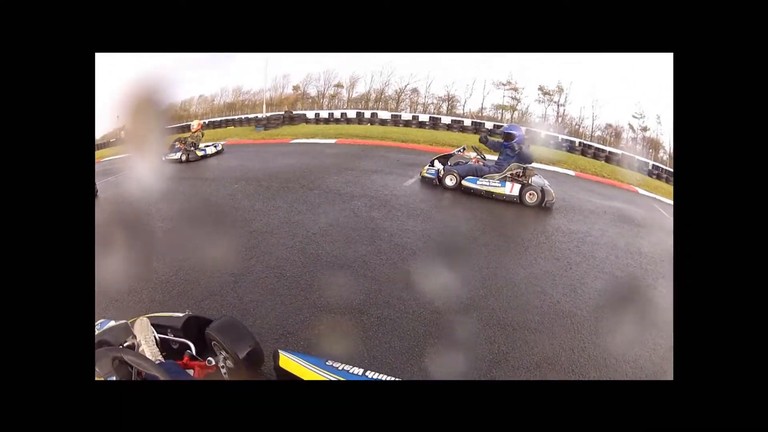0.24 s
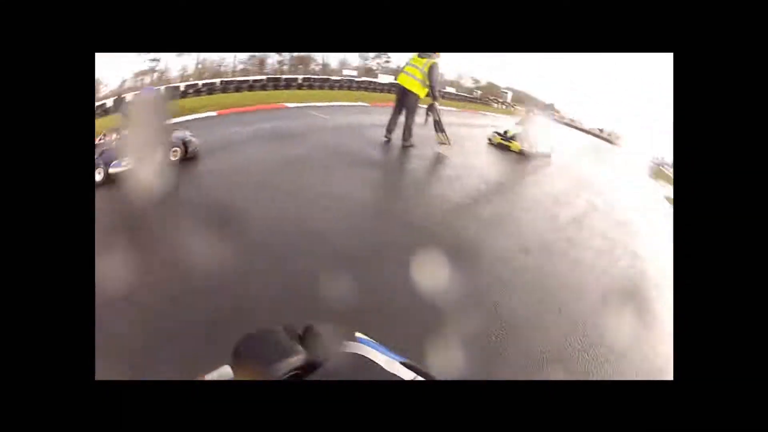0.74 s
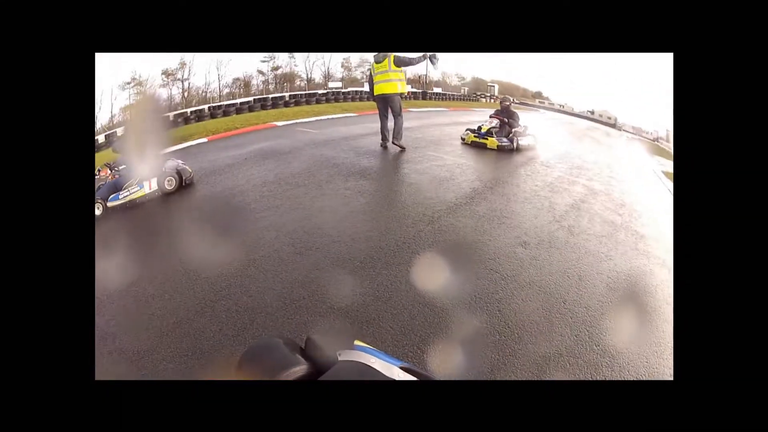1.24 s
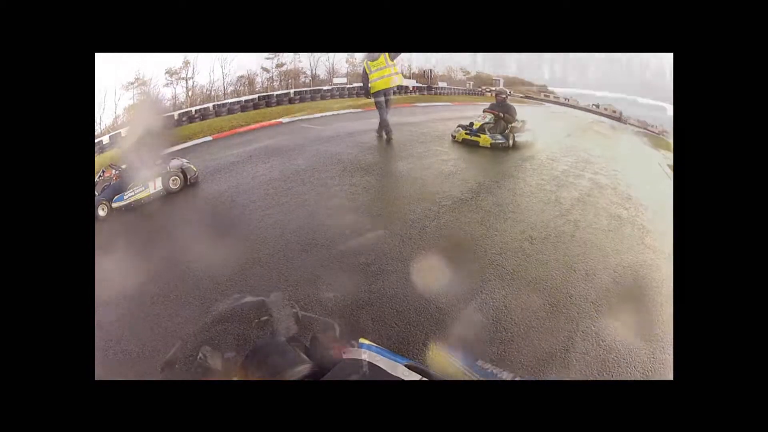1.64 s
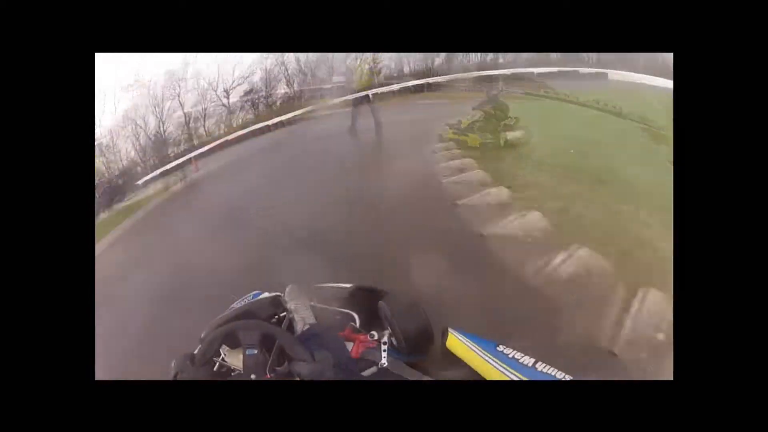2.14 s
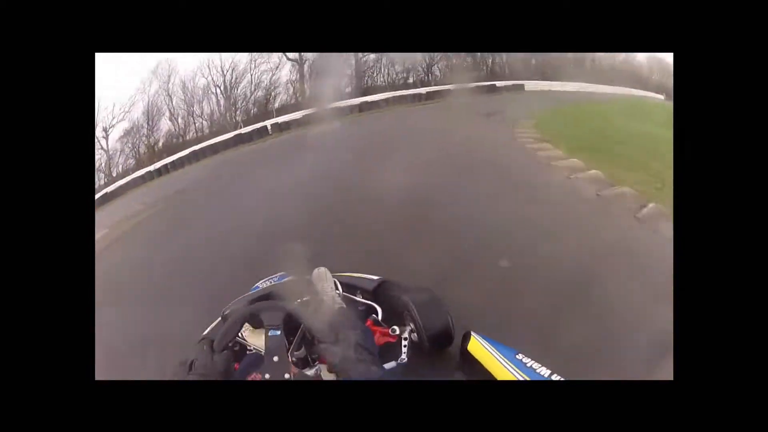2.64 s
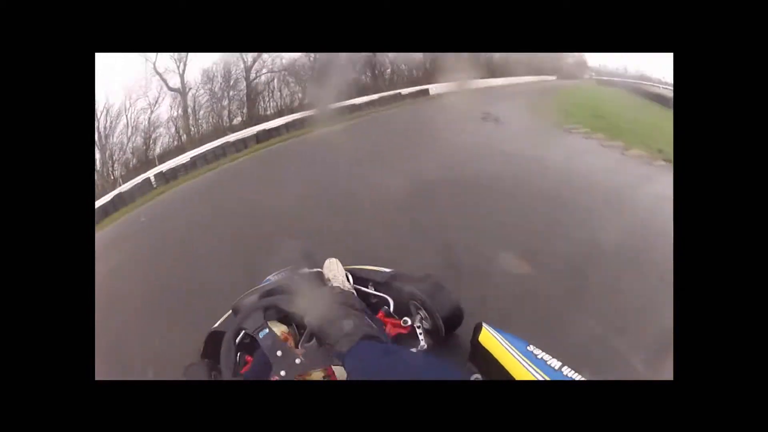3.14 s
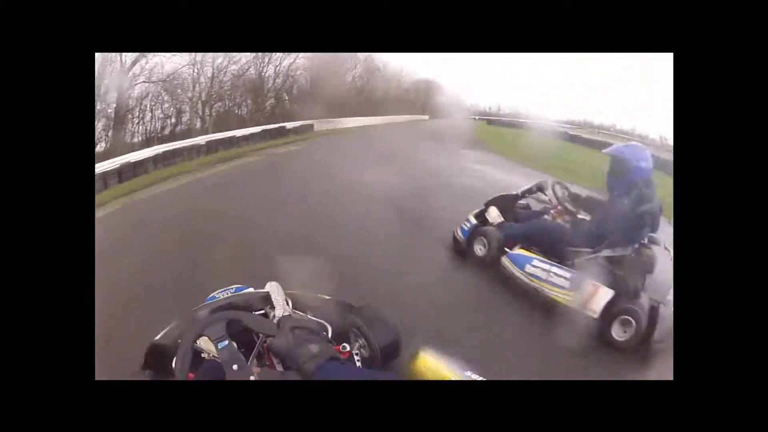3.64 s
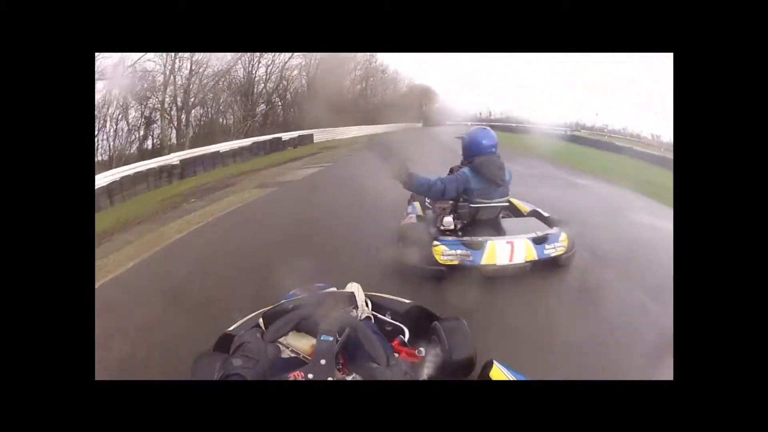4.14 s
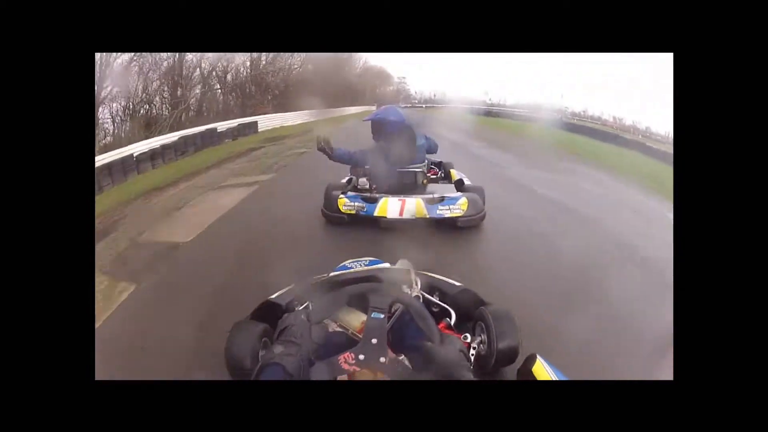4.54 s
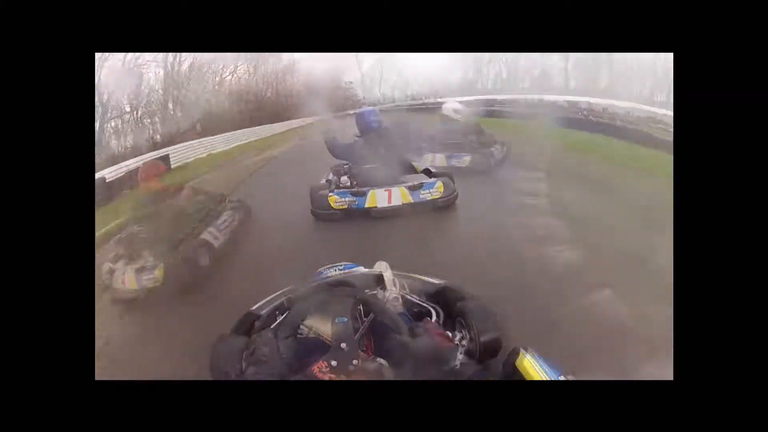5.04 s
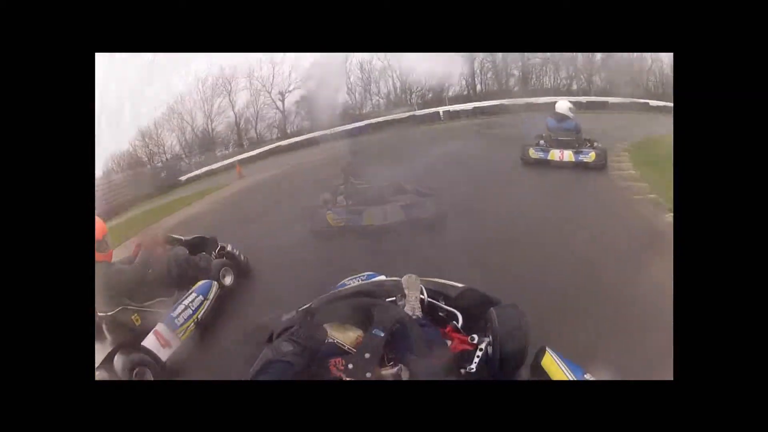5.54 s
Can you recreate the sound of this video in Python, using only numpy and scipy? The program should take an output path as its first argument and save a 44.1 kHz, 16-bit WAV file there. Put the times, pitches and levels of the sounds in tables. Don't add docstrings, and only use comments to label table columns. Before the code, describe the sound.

Outdoors on a wet kart track, heard through a sealed camera case on the kart. A quiet, dull throbbing rumble with light hiss and small dry ticks comes first. At about one and a half seconds it jumps to loud wind buffeting, booming jolts and hiss. The kart coasts, then its engine comes on throttle as a gritty buzzing rattle while another kart passes close.

```python
import sys
import numpy as np
from scipy import signal
from scipy.fft import rfft, irfft
from scipy.io import wavfile
from scipy.ndimage import uniform_filter1d

SR = 44100
rng = np.random.default_rng(int(sys.argv[2]) if len(sys.argv) > 2 else 0)


def log_audio(samples):
    frames = np.atleast_2d(samples).T
    limited = np.clip(frames, -1, 1)
    pcm = np.round(limited * 32767).astype(np.int16)
    wavfile.write(sys.argv[1], SR, pcm)


def elevation(decibels):
    levels = np.asarray(decibels, float)
    return 10 ** (levels / 20)


N = 255780
CHANGE_S = 1.4805

# frequency in Hz, width in Hz, then levels in dB of the idle hiss, the road hiss,
# the own rattle and the other kart's rattle.
CASE_MODES = [(813, 67, -19, -19.5, -17.5, -30), (1197.5, 89, -7.5, -10, -10.5, -9.5),
              (1574, 250, -6.5, -10.5, -17, -6.5), (2030, 300, -7, -5.5, -3.5, -7.5),
              (2400, 148, -8.5, -6, -7, -13), (3560, 170, -3.5, -9.5, -12, -3),
              (4750, 408, -32, -22.5, -14.5, -19), (5307, 630, -16.5, -16.5, -7.5, -9),
              (3550, 2600, -28, -24, -12.5, -12)]


def curve(rows):
    s, *columns = np.transpose(rows)
    return np.array([np.interp(np.arange(N) / SR, s, c) for c in columns])


def by_scene(queue, road):
    return np.where(np.arange(N) / SR < CHANGE_S, queue, road)


def unit(x):
    return x / np.sqrt(np.mean(x ** 2))


def ring(x, hz, width_hz):
    return signal.lfilter(*signal.iirpeak(hz, hz / width_hz, fs=SR), x)


def walk(rate_hz):
    k = int(SR / rate_hz)
    steps = np.repeat(rng.standard_normal(N // k + 1), k)[:N]
    return unit(uniform_filter1d(steps, k))


def swells(times_s, crests_db, holds_s, rise_db_s, fall_db_s, calm_db):
    t = np.arange(N) / SR
    power = elevation(2 * calm_db)
    for s, db, held_s in zip(times_s, crests_db, holds_s):
        near = slice(max(int((s - .25) * SR), 0), int((s + held_s + .35) * SR))
        before_s = np.clip(s - t[near], 0, None)
        after_s = np.clip(t[near] - s - held_s, 0, None)
        power[near] += elevation(2 * (db - rise_db_s * before_s - fall_db_s * after_s))
    return 10 * np.log10(power)


def wind_leak(level_db):
    # frequency in Hz, spectrum level in dB per Hz.
    spectrum = [(60, 2.5), (130, 0), (220, -0.5), (330, -5.5), (450, -11), (700, -14.5), (1000, -21),
                (3000, -44), (6000, -38)]
    bin_hz, bin_db = np.transpose(spectrum)
    hz = np.fft.rfftfreq(N, 1 / SR) + 1
    shape = elevation(np.interp(np.log(hz), np.log(bin_hz), bin_db, left=-40))
    rumble = unit(irfft(rfft(rng.standard_normal(N)) * shape, N))
    throb = elevation(3.0 * np.cos(2 * np.pi * 27 * np.arange(N) / SR + .8 * walk(4)))
    rumble = by_scene(unit(throb * ring(rumble, 230, 300)), rumble)
    return rumble * elevation(level_db + 3.0 + walk(25))


def buffets(calm_db):
    # crest in seconds, level in dB, hold in seconds.
    crests = [(.32, -58, .03), (.58, -67, 0), (.74, -56, 0), (1.0, -58, .47), (1.49, -43, .02),
              (2.04, -42, .08), (2.25, -48, .25), (2.55, -43, .15), (2.84, -41, .02), (3.13, -51, 0.0055),
              (3.31, -47.5, 0), (3.41, -47, 0), (3.88, -42, 0.026), (4.08, -47, .3), (4.77, -40, .05),
              (4.95, -45, 0.33), (5.45, -46, 0.12), (5.78, -42, .02)]
    s, crest_db, held_s = np.transpose(crests)
    level_db = swells(s, crest_db, held_s, rise_db_s=200, fall_db_s=148, calm_db=calm_db)
    level_db = by_scene(np.minimum(level_db, -53), level_db)
    push = rng.standard_normal(N)
    queue = unit(ring(ring(push, 28.49, 11), 28.43, 14))
    road = unit(ring(ring(push, 37.5, 24), 36.39, 30))
    return by_scene(queue, road) * elevation(level_db)


def jolts():
    # start in seconds, peak in dB, ring time to -60 dB in seconds.
    bumps = [(0.746, -38, 0.2), (1.583, -23, 0.1), (1.679, -25, 0.12), (1.864, -17.5, 0.14),
             (1.914, -26, 0.05), (1.979, -26, 0.1), (2.018, -15.5, 0.2), (2.199, -27, 0.17),
             (2.419, -21, 0.07), (2.507, -29, 0.2), (4.784, -25, 0.03), (4.952, -16, 0.18),
             (4.984, -19, 0.15), (5.058, -17, 0.14), (5.184, -18, 0.28), (5.652, -19, .12)]
    t = np.arange(N) / SR
    swing = np.zeros(N)
    for s, db, t60_s in bumps:
        onset = np.clip((t - s) / 0.0083, 0, 1)
        swing += elevation(db - 3.5 - 60 * np.abs(t - s) / t60_s) * onset
    return swing


def mount(calm_db):
    # crest in seconds, level in dB, pitch in Hz, hold in seconds.
    queue_gusts = [(.11, -55, 101.1, .02), (.2, -55, 109, .04), (.28, -55, 109.5, .07),
                   (.44, -59, 100, 0.11), (.68, -54, 112, .06), (.84, -55, 114, .01), (.9, -54, 114, .08),
                   (1.06, -51, 101, .04), (1.12, -44.5, 109, .01), (1.2, -49, 107, .01),
                   (1.3, -49, 99.8, .02), (1.36, -48, 105.4, .11)]
    road_gusts = [(1.49, -31.5, 102.1, .06), (1.59, -22.5, 104, 0.023), (1.7, -24.5, 104.4, 0.011),
                  (1.76, -33, 92.05, 0.091), (1.95, -27.5, 92.03, .04), (2.09, -25, 102, 0.048),
                  (2.21, -25, 95.1, .02), (2.29, -32, 101, .06), (2.44, -25.5, 100.6, 0),
                  (2.52, -28.5, 104, 0.011), (2.63, -33, 98, 0.022), (2.71, -32.5, 101, 0.12),
                  (2.93, -33.5, 106, .08), (3.16, -33.5, 100.5, 0.059), (3.33, -32.5, 101.2, 0.073),
                  (3.46, -33.5, 103, 0.015), (3.54, -33, 103, 0), (3.66, -32, 98.5, .02),
                  (3.76, -35, 107.4, 0), (3.86, -33.5, 106.7, .02), (4.07, -33, 103.9, 0.065),
                  (4.19, -32, 104.3, 0.049), (4.32, -33, 103.1, 0.173), (4.64, -36, 97.9, 0.038),
                  (4.82, -28.5, 100.1, .08), (5.09, -25, 105, .09), (5.2, -17.5, 101.1, 0.027),
                  (5.35, -20, 101, 0.054), (5.46, -28, 102, 0.031), (5.58, -29, 104, .17)]
    s, crest_db, pitch_hz, held_s = np.transpose(np.concatenate([queue_gusts, road_gusts]))
    level_db = swells(s, crest_db, held_s, rise_db_s=400, fall_db_s=450, calm_db=calm_db)
    level_db = by_scene(np.minimum(level_db, -44), level_db)
    hz = np.interp(np.arange(N) / SR, s, pitch_hz)
    tone = np.sqrt(2) * np.sin(2 * np.pi * np.cumsum(hz) / SR + 0.71 * walk(20))
    rough = unit(ring(ring(rng.standard_normal(N), 114, 38), 114, 38))
    return unit(tone + elevation(-11) * rough) * (elevation(level_db - 2.5) + jolts())


def case_hiss(level_db):
    shared_db = 1.5 * (.6 * walk(14) + 1.2 * walk(60)) / 1.74
    out = np.zeros(N)
    for hz, width_hz, idle_db, road_db, *_ in CASE_MODES:
        mode = unit(ring(rng.standard_normal(N), hz, width_hz))
        out += mode * elevation(by_scene(idle_db, road_db) + shared_db + 1.2 * walk(30))
    return out * elevation(level_db)


def ticks():
    # start in seconds, peak in dB, pitch in Hz, crack level in dB.
    taps = [(0.5436, -45, 1500, -7), (0.5475, -36, 2150, -5), (0.5586, -41, 2600, 1),
            (0.5687, -34.5, 1970, 1), (.631, -40, 3700, -4), (0.6406, -38, 2400, 1), (.67, -42, 3610, 3),
            (0.6947, -38.5, 1400, 0), (0.733, -35, 2110, -11), (.8044, -45.5, 3560, 4.5),
            (1.0743, -44, 3500, -1), (1.0795, -45, 3500, 1), (1.1966, -43, 3500, -4),
            (1.3623, -42.5, 3410, 3), (1.41, -51, 3500, 3)]
    out, t = np.zeros(N), np.arange(600) / SR
    for s, db, hz, crack_db in taps:
        grit = np.sin(2 * np.pi * 4200 * t) + 1.05 * rng.standard_normal(len(t))
        crack = elevation(crack_db - 1.0) * grit * np.exp(-t / 0.00062)
        tap = crack + np.sin(2 * np.pi * hz * t) * np.exp(-t / 0.0012)
        onset = 1 - np.exp(-t / .00012)
        out[int(s * SR):][:len(t)] += elevation(db + 2.5) * tap * onset
    return out


def squeaks():
    # start in seconds, level in dB, start pitch in Hz, end pitch in Hz, length in seconds.
    rubs = [
        (2.807, -44.5, 4770, 4560, 0.038),
        (2.878, -48.5, 4750, 4650, .018),
        (2.91, -38.5, 4970, 4750, 0.026),
        (3.736, -29, 5500, 5118, 0.013),
        (5.65, -50, 4460, 4480, .11),
    ]
    out = np.zeros(N)
    for s, db, start_hz, end_hz, length_s in rubs:
        n = int(length_s * SR)
        jitter = 1 + 0.00078 / length_s * walk(710)[:n]
        cycles = np.cumsum(np.linspace(start_hz, end_hz, n) * jitter) / SR
        level = elevation(db + 4.4 * walk(269.9)[:n]) * np.hanning(n)
        out[int(s * SR):][:n] += level * np.sin(2 * np.pi * cycles)
    return out


def crank_hum(cycles):
    # time in seconds, hum level in dB.
    hum_level = [(1.49, -32.5), (1.65, -41.5), (1.9, -30.5), (2.08, -36), (2.26, -48), (2.33, -37),
                 (2.92, -44), (3.05, -33), (3.82, -32.5), (3.9, -47), (4.0, -41), (4.07, -52),
                 (4.13, -38.5), (4.73, -34), (5.17, -31.5), (5.41, -38.5), (5.49, -32.5), (5.8, -39)]
    # multiple of the firing rate, level in dB.
    orders = [(3, -9), (4, -9), (6, -21), (8, -32), (10, -17), (12, -18)]
    turn = 2 * np.pi * (cycles - .265)
    level_db = by_scene(-120, curve(hum_level)[0])
    clean = np.sqrt(2) * np.cos(2 * turn + .15 * walk(8))
    upper = np.zeros(N)
    for multiple, db in orders:
        upper += elevation(db + 2.0 * walk(12)) * np.cos(round(multiple) * turn + 0.71 * walk(14))
    rough = unit(ring(ring(rng.standard_normal(N), 63, 16), 63, 22))
    share = np.clip((np.arange(N) / SR - 2.7) / .15, 0, .97)
    low = (share * clean + 0.84 * np.sqrt(1 - share ** 2) * rough) * elevation(level_db)
    return low + share * upper * elevation(uniform_filter1d(level_db, SR // 2))


def own_cycles():
    coast_hz, climb_from_hz, governed_hz = 26, 27.5, 32.33
    throttle_s, climb_s = 2.88, .26
    t = np.arange(N) / SR
    climb_hz = governed_hz - (governed_hz - climb_from_hz) * np.exp((throttle_s - t) / climb_s)
    return -.1 + np.cumsum(np.where(t < throttle_s, coast_hz, climb_hz)) / SR


def other_cycles():
    # time in seconds, firing rate in Hz.
    rate = [
        (3, 29.9),
        (4, 30.3),
        (4.2, 32),
        (4.6, 32.2),
    ]
    return -11 + np.cumsum(curve(rate)[0]) / SR


def rattle(cycles, level_db, column, rise, fall, colour_db):
    firing = np.round(cycles).astype(int)
    chance = rng.standard_normal((200, len(CASE_MODES) + 1, 2))[firing].T
    phase = cycles - firing + .02 * chance[0, -1]
    size = elevation(chance[1, -1])
    out = np.zeros(N)
    for mode, slip, tint in zip(CASE_MODES, *chance):
        hz, width_hz = mode[:2]
        late = phase + .04 * slip
        decay = np.where(late < 0, (late / rise) ** 2, late / fall)
        burst = size * elevation(colour_db * tint) * np.exp(-decay)
        grit = ring(rng.standard_normal(N), hz, 2 * width_hz)
        grit = grit / uniform_filter1d(np.abs(grit), 60) ** .6
        out += elevation(mode[column]) * unit(ring(grit * burst, hz, width_hz))
    return out * elevation(level_db)


def engine_rattle(own):
    # time in seconds, own rattle level in dB.
    own_load = [(1.5, -79.5), (2.75, -86), (2.95, -47), (3.3, -45), (3.6, -43.5), (3.9, -40), (4.2, -42),
                (4.5, -41), (4.8, -42), (5.1, -41), (5.35, -44.5), (5.6, -41.5), (5.8, -41.5)]
    # time in seconds, other kart's rattle level in dB.
    other_near = [
        (3.05, -76),
        (3.3, -48),
        (3.55, -52),
        (3.8, -44),
        (4.05, -51.5),
        (4.2, -47.5),
        (4.45, -76),
    ]
    # hard firing in seconds, extra level in dB.
    hard = [(3.445, 4), (3.51, 2.5), (3.74, 4.5), (3.775, 3.5), (4.005, 1), (4.04, 2), (4.072, 2.5),
            (4.103, 3), (4.17, 1), (4.443, 1.5), (4.475, 2.5), (4.565, 1.5), (4.72, 3.5), (4.75, 2),
            (5.247, 3), (5.62, 2.5), (5.68, 2.5), (5.745, 1), (5.775, 1.5)]
    t = np.arange(N) / SR
    hard_db = sum(db * np.exp(-((t - s) / .01) ** 2) for s, db in hard)
    own_db = by_scene(-120, curve(own_load)[0]) + hard_db
    other_db = curve(other_near)[0] + hard_db
    near = rattle(own, own_db, column=4, rise=0.12, fall=0.12, colour_db=2.0)
    passing = rattle(other_cycles(), other_db, column=5, rise=0.076, fall=0.087, colour_db=2.2)
    return near + passing


def scene():
    # time in seconds, case hiss in dB, wind against the hiss in dB.
    pace = [(1.49, -39, -6), (1.68, -41.5, -5.5), (1.83, -40, -4.5), (2.04, -40.5, -5.5), (2.17, -42.5, -2),
            (2.49, -44.5, -4), (2.9, -44, -5.5), (3.21, -40, -4), (3.8, -40.5, -5.5), (3.9, -39.5, -3.5),
            (4.05, -41.5, -2), (4.72, -41.5, -3), (5.07, -36.5, -3.5), (5.29, -38, -4), (5.8, -39, -4.5)]
    pace_db, air_db = curve(pace)
    air = wind_leak(by_scene(-59.5, pace_db + air_db)) + buffets(by_scene(-68, pace_db - 13))
    shake = mount(by_scene(-67, pace_db - 3))
    case = case_hiss(by_scene(-56.5, pace_db)) + ticks() + squeaks()
    own = own_cycles()
    return (air + shake + case + crank_hum(own) + engine_rattle(own))[None]


def roll_off(x):
    return signal.sosfilt(signal.butter(12, 16120, fs=SR, output="sos"), x)


def record(dry):
    x = signal.sosfilt(signal.butter(4, 5500, fs=SR, output="sos"), dry)
    slow = signal.resample_poly(x, 40, 147, axis=1)
    held = np.repeat(slow, 4, axis=1)
    held = signal.resample_poly(held, 147, 160, axis=1)[:, :N]
    mix = signal.sosfilt(signal.ellip(14, .3, 75, 15270, fs=SR, output="sos"), held)
    return roll_off(mix)


dry = scene()
out = record(dry)
log_audio(out)
```